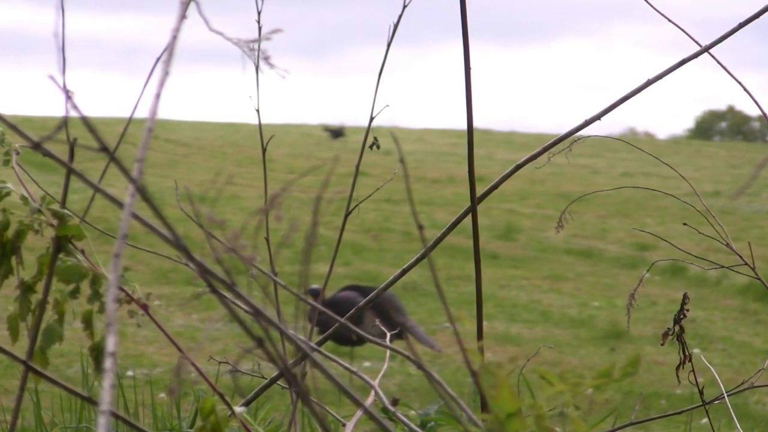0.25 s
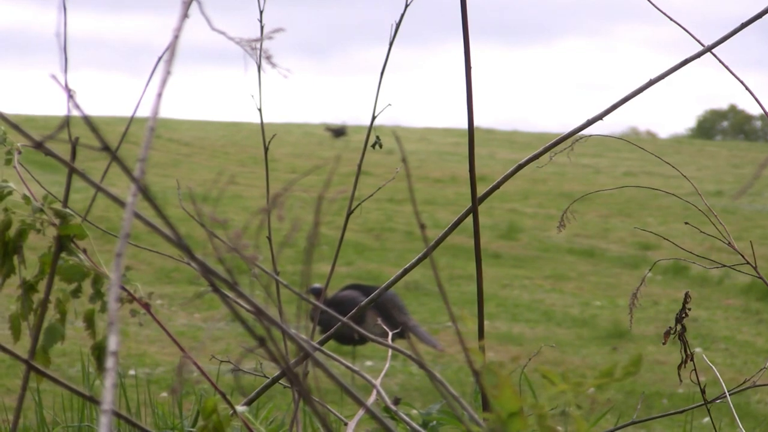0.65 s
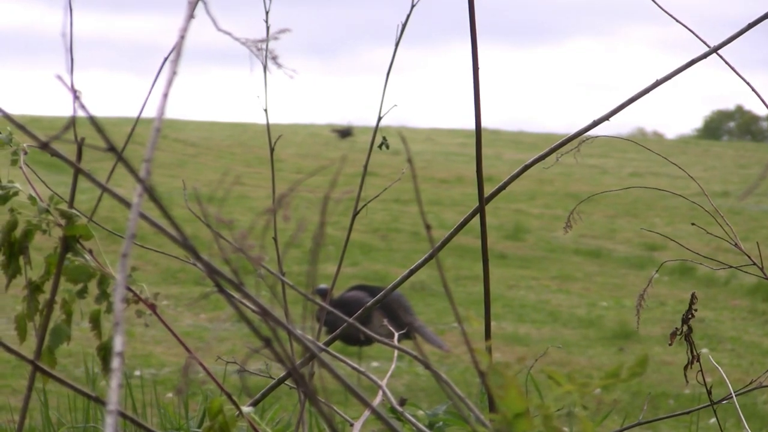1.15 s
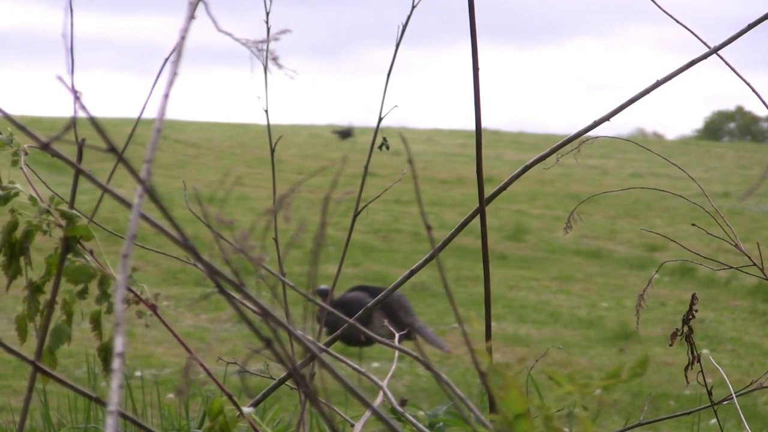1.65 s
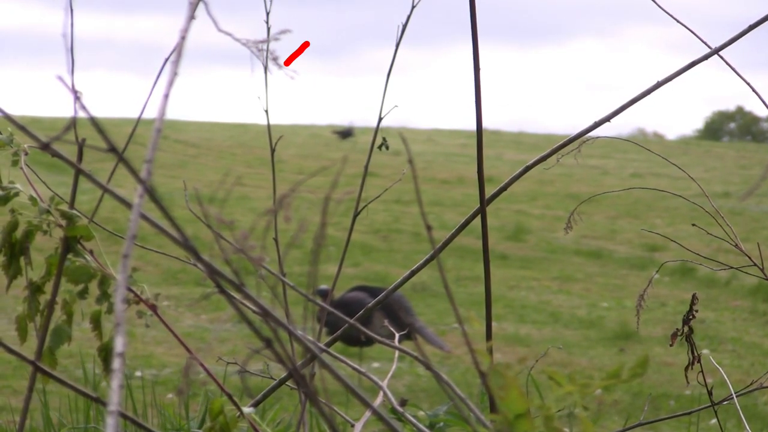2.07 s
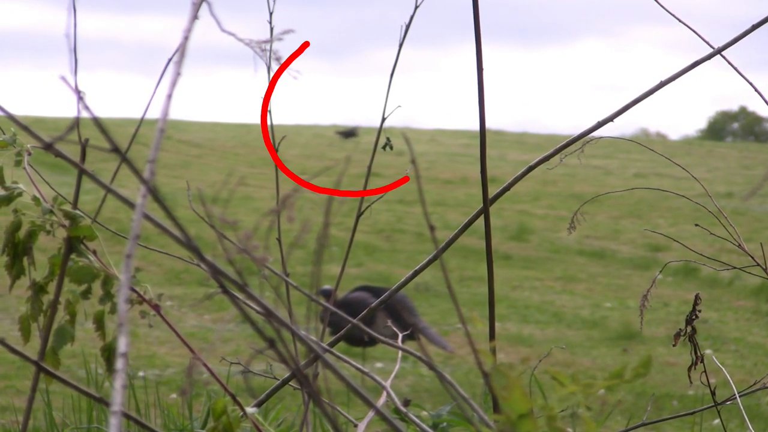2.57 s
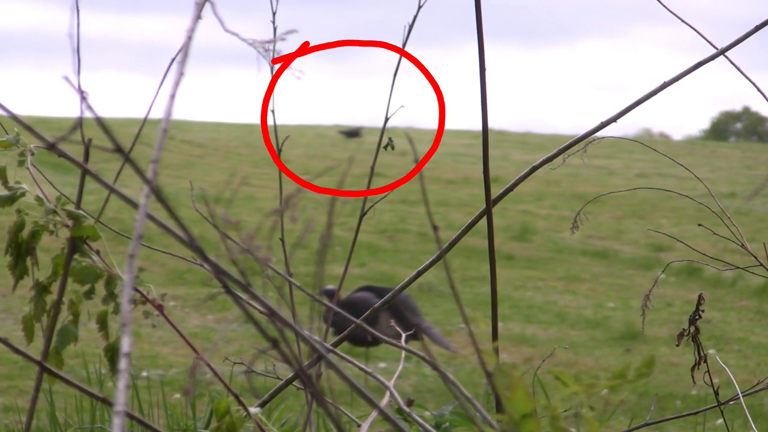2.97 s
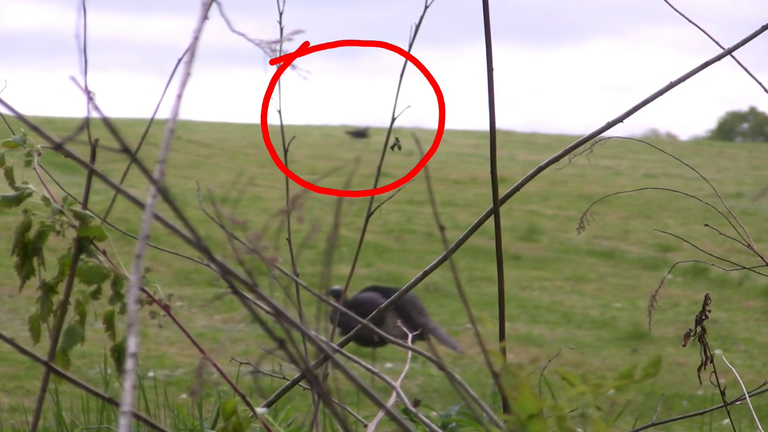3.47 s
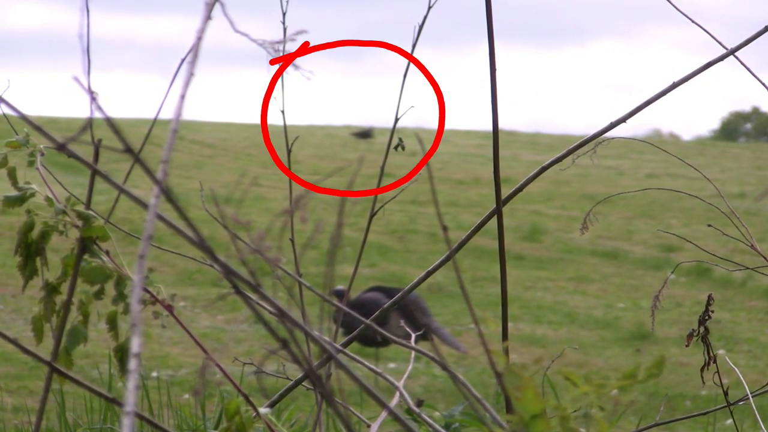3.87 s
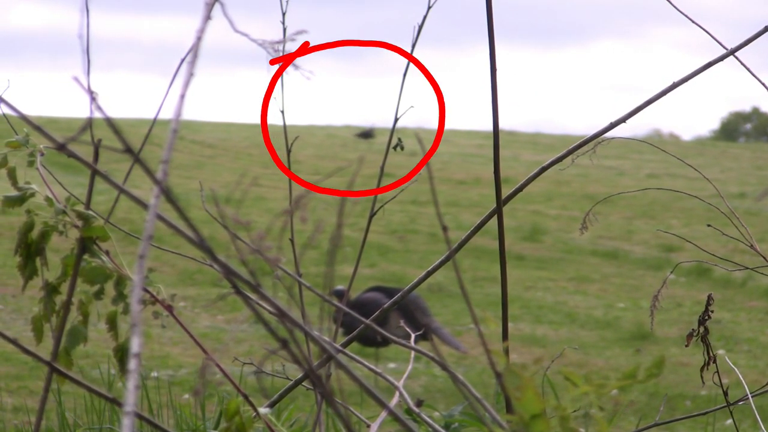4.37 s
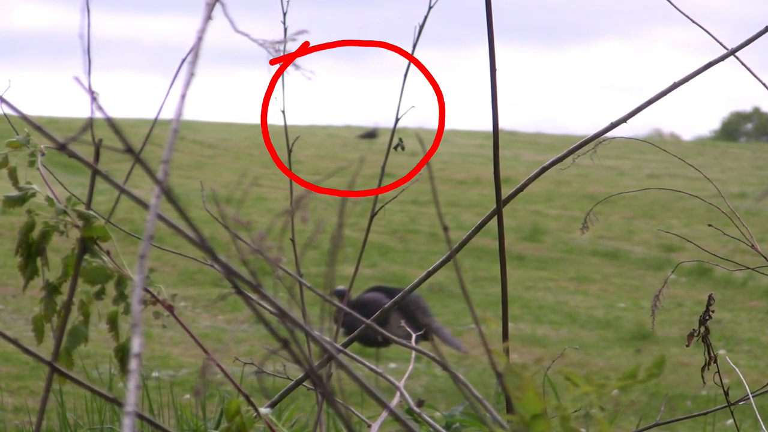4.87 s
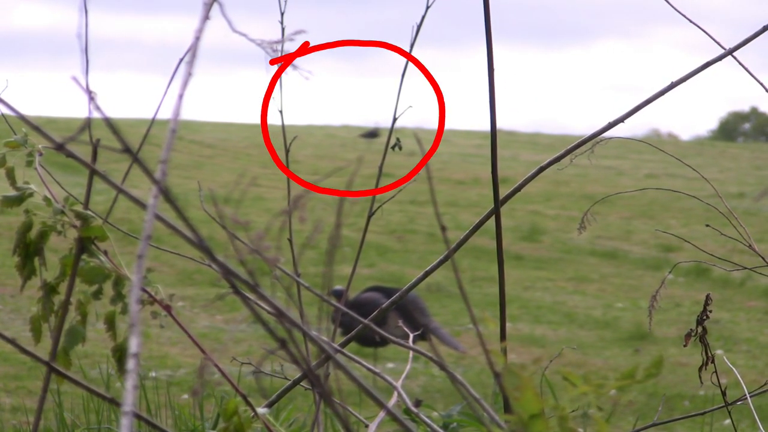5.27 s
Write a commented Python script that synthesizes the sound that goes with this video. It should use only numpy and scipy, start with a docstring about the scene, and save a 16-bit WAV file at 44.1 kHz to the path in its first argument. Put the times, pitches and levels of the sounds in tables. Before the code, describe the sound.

Soft outdoor air with gentle hiss and a very low camera hum runs throughout, slightly wide, with everything else centred. From 0 to 2.5 s distant birds call faintly: soft, short arched hoots at 0, 1.0, 1.5 and most clearly 2.0 s, thin chirps, and a small seesaw call repeating four times from 1.9 to 2.4 s. Dry twig ticks and light leaf rustles come close by between 1.4 and 3.2 s. At about 2.55 s a wild turkey gobbles once: several bright, rough yelps over a fast two-note rattle that slows, sinks and dies by 3.6 s, prolonged by tree echoes. From 3.2 s a warbler enters quietly, with dips near 3.4 and 3.6 s, a steep swoop around 4 s, then louder zigzag, arching and falling whistles until 5.5 s. A second singer gives lower short slurs deeper in the wood.

```python
"""Quiet country air, a camera's hum and faint bird calls come first, at the edge of a wood by a pasture.
A wild turkey gobbles once, uneven harmonics through a throat and beak; echoes off the trees prolong it.
As it dies away a warbler sings sliding sine whistles over a second singer deeper in the wood.
Twigs tick and leaves rustle near the microphone, as short bursts and swells of filtered noise."""
import sys
import numpy as np
from scipy import signal
from scipy.fft import rfft, irfft, next_fast_len
from scipy.io import wavfile
from scipy.ndimage import uniform_filter1d

SR = 44100
rng = np.random.default_rng(int(sys.argv[2]) if len(sys.argv) > 2 else 0)


def persist_wave(psi):
    """Save psi, clipped to +-1, as 16-bit WAV."""
    counts = np.round(np.clip(psi, -1, 1) * 32767).astype(np.int16)
    wavfile.write(sys.argv[1], SR, np.atleast_2d(counts).T)


N = 243431
TIME = np.arange(N) / SR
FREQ = np.maximum(np.fft.rfftfreq(N, 1 / SR), 1)


def undb(db):
    """Decibels to gain."""
    return 10 ** (np.asarray(db) / 20)


def unit(x):
    """Scale to rms 1."""
    return x / np.sqrt(np.mean(x ** 2) + 1e-20)


def add(out, start, x):
    """Mix x in at a time in seconds, dropping what falls outside."""
    at = int(start * SR) + np.arange(len(x))
    inside = (at >= 0) & (at < N)
    out[at[inside]] += x[inside]


def walk(size, rate):
    """Random wander of spread near 1: straight lines between new values, rate of them a second."""
    at = np.arange(size) * rate / SR
    count = int(at[-1]) + 2
    return 1.2 * np.interp(at, np.arange(count), rng.standard_normal(count))


def colour(points):
    """Gain at every frequency from (frequency [Hz], level [dB]) points."""
    hz, db = np.transpose(points)
    return undb(np.interp(np.log(FREQ), np.log(hz), db))


def resonate(x, modes, tilt_db=0):
    """Pass a short sound through (Hz, width Hz, dB) resonances, tilted in dB per octave above 1100 Hz."""
    size = next_fast_len(len(x) + 512)
    f = np.maximum(np.fft.rfftfreq(size, 1 / SR), 1)
    power = 0
    for hz, width, db in modes:
        detuning = (f * f - hz * hz) / (f * width * 2)
        power = power + undb(2 * db) / (1 + detuning ** 2) ** 2
    tilt = undb(tilt_db * np.log2(np.maximum(f / 1100, 1)))
    return irfft(rfft(x, size) * np.sqrt(power) * tilt, size)[:len(x)]


def syllable(length, hz0, hz1, rough, bright_db, beak_hz, beak_db=1):
    """One gobble note: a stack of harmonics whose cycles grow uneven and noisy as it roughens."""
    # resonances of the turkey's throat: (frequency [Hz], width [Hz], level [dB])
    throat = [(686, 220, -5), (1104, 510, 6.5), (1800, 120, -1.5), (2190, 320, 2.5), (3160, 460, -5),
              (4200, 640, -13)]
    jitter, flutter_db, rasp = 0.065, 5, .9  # pitch share, level and noise at full roughness
    size = int(length * SR)
    hz = np.linspace(hz0, hz1, size) * (1 + jitter * rough * walk(size, 535))
    phase = 2 * np.pi * np.cumsum(hz) / SR
    # the way through grass and leaves shifts each harmonic by its own amount
    shift = rng.uniform(0, 2 * np.pi, (7, 1))
    harmonics = np.cos(np.outer(np.arange(1, 8), phase) + shift)
    tone = unit(harmonics.sum(0))
    # breath noise pulses once a cycle
    turbulence = rng.standard_normal(size) * (1 + np.cos(phase))
    source = tone * undb(flutter_db * rough * walk(size, 337)) + rasp * rough * turbulence
    voice = resonate(source * signal.windows.tukey(size, .8), throat, bright_db)
    # the shaking neck and beak single out a different partial in each note
    beak = resonate(voice, [(beak_hz, 260, 0)])
    return unit(voice + undb(beak_db) * beak)


def yelps():
    """The gobble's bright yelps, each rising slightly in pitch."""
    # (start [s], length [s], middle pitch [Hz], level [dB], roughness [0-1], beak resonance [Hz])
    notes = [(2.542, 0.03, 580, -47.5, 0.27, 2170), (2.609, .04, 618, -45, 0.57, 1830),
             (2.682, .033, 573.6, -50.5, 0.47, 1160), (2.747, .034, 654, -51, 0.62, 3300),
             (2.843, 0.037, 609.3, -45.5, 0.54, 1960), (3.06, 0.033, 596.4, -48, 0.35, 1770)]
    rise, bright_db = 0.049, 3  # share of pitch gained; dB per octave
    out = np.zeros(N)
    for start, length, hz, db, rough, beak_hz in notes:
        glide = hz * rise / 2
        add(out, start, undb(db) * syllable(length, hz - glide, hz + glide, rough, bright_db, beak_hz))
    return out


def rattle():
    """The rattle under the yelps flips between two notes as it slows, sinks and dies away."""
    # course of the rattle: (time [s], low note [Hz], high note [Hz], level [dB])
    course = [(2.571, 573, 750, -51.5), (2.65, 571, 720, -51.5), (2.82, 553, 703.7, -54.5),
              (2.959, 500.4, 649, -55.5), (3.2, 487, 602.5, -60), (3.6, 454, 534.5, -63)]
    notes_per_s, slowing_s = 36, 1.5  # notes a second at first; time in which the gaps double
    note_s, sag, scatter = 0.044, .035, 0.019  # length; share of pitch lost in a note; pitch scatter
    rough, bright_db, beak_db = 0.57, -1.5, 6  # roughness 0-1; dB per octave; beak ring
    out = np.zeros(N)
    s, low, high, level = np.transpose(course)
    start, is_low = s[0], True
    while start < s[-1]:
        hz = np.interp(start, s, low if is_low else high)
        hz = hz * (1 + scatter * rng.standard_normal())
        # the beak rings with the low note's octave and with the high note itself
        beak_hz = 2 * hz if is_low else hz
        note = syllable(note_s, hz, hz * (1 - sag), rough, bright_db, beak_hz, beak_db)
        add(out, start, undb(np.interp(start, s, level)) * note)
        start += (1 + (start - s[0]) / slowing_s) / notes_per_s
        is_low = not is_low
    return out


def turkey():
    """The gobble: a few bright yelps over the two-note rattle."""
    return yelps() + rattle()


def whistle(points, waver=0.0033, shimmer_db=2.0):
    """A pure tone that slides through (s, Hz, dB) points with rounded corners in pitch."""
    s, hz, db = np.transpose(points)
    t = np.arange(s[0], s[-1] + 0.0021, 1 / SR)
    pitch = uniform_filter1d(np.interp(t, s, hz), size=260)
    pitch = pitch * (1 + waver * walk(len(t), 405.2))
    edges = np.clip(np.minimum(t - t[0], t[-1] - t) / 0.0022, 0, 1)
    level = undb(np.interp(t, s, db) + shimmer_db * walk(len(t), 203.6))
    return edges * level * np.sin(2 * np.pi * np.cumsum(pitch) / SR)


def figures(shape, notes, waver):
    """One figure sung several times, each at its own length, pitch and strength."""
    out = np.zeros(N)
    for start, length, top_hz, db in notes:
        add(out, start, undb(db) * whistle(np.array(shape) * [length, top_hz, 1], waver))
    return out


def slurs(notes, waver):
    """Whistles that bend along one smooth arc, swelling once and fading."""
    end_drop_db = 10.5  # both ends lie this far under the loudest moment
    out, u = np.zeros(N), np.linspace(0, 1, 21)
    for start, length, hz0, hz_mid, hz1, db, loudest in notes:
        arc = np.polyfit([0, .5, 1], [hz0, hz_mid, hz1], 2)
        hz = np.polyval(arc, u)
        fade_db = end_drop_db * np.interp(u, [0, loudest, 1], [1, 0, 1])
        add(out, start, whistle(np.column_stack([u * length, hz, db - fade_db]), waver))
    return out


def warble(waver=0.0063):
    """The warbler's sine song: two dips, a swoop, then zigzag, arch and falling slur in turn."""
    # levels here stand before the lift that scene() gives the song
    # shapes of three figures: (share of length, share of top pitch, level [dB])
    dip = [(0, 1, -7), (.18, .85, -1), (.44, .71, -13), (.7, 0.97, 2), (.83, 1, -14), (1, 1, -11)]
    zigzag = [(0, .63, -11.5), (.17, .64, -4), (.35, .78, 0), (.5, 1, -1.5), (.6, .74, -0.5),
              (.71, .71, -8), (.87, .91, 2.5), (1, 0.97, -6)]
    arch = [(0, .6, -11), (.19, .65, -6), (.35, .75, -0.5), (.52, .92, -16), (.67, 0.99, -12.5),
            (.76, .9, -8.5), (.85, .77, -2.5), (.92, .745, 1.5), (1, 0.91, -17)]
    # where each figure is sung: (start [s], length [s], top pitch [Hz], level [dB])
    dips = [(3.396, .157, 4280, -50), (3.636, .164, 4300, -47)]
    zigzags = [(4.307, 0.12, 5210, -47), (4.856, 0.11, 5270, -39), (5.39, .122, 5030, -42.5)]
    arches = [(4.486, .134, 6044, -36.5), (5.036, .125, 6100, -34.5)]
    # one long swoop: (time [s], pitch [Hz], level [dB])
    swoop = [(3.88, 5790, -62), (3.925, 6710, -75), (3.965, 5417, -60.5), (3.982, 4300, -52),
             (3.987, 4000, -48.5), (4.012, 3483, -45.5), (4.05, 2880, -49), (4.141, 2750, -59),
             (4.19, 3045, -50), (4.212, 3576, -44), (4.245, 3590, -52), (4.26, 3430, -66)]
    # plain slurs: (start [s], length [s], start pitch [Hz], middle pitch [Hz], end pitch [Hz],
    # level [dB], loudest at [share of length])
    plain_slurs = [(3.22, 0.071, 3900, 4300, 4500, -62, 0.31),
                   (3.835, 0.038, 5600, 4980, 4510, -52.5, 0.84),
                   (4.135, 0.085, 4120, 3560, 2500, -48.5, 0.67),
                   (4.716, .078, 4100, 3375, 2596, -36, 0.22), (5.212, 0.1, 4300, 3550, 2540, -37, 0.15)]
    out = figures(dip, dips, waver) + figures(zigzag, zigzags, waver)
    out += figures(arch, arches, waver) + slurs(plain_slurs, waver)
    add(out, swoop[0][0], whistle(swoop, waver))
    return out


def deep_singer():
    """The singer deep in the wood: sine whistles bent into short slurs."""
    # (start [s], length [s], start pitch [Hz], middle pitch [Hz], end pitch [Hz],
    # level before the lift in scene() [dB], loudest at [share of length])
    notes = [(3.572, 0.03, 3070, 2790, 2690, -54, 0.28), (3.65, .065, 3290, 2850, 2710, -51, 0.96),
             (4.004, 0.072, 3340, 2830, 2470, -44, 0.25), (4.04, .12, 3050, 2794, 2800, -57, 0.089),
             (4.10, 0.098, 2380, 2466, 2900, -48.5, 1), (4.513, 0.048, 3230, 2763, 3100, -44, 0.4),
             (4.55, 0.18, 3230, 3032, 1957, -42.5, .2), (4.962, .11, 1987, 2385, 3074, -45.5, 1),
             (5.06, 0.1, 2994, 3150, 3004, -41, 0.081), (5.47, 0.041, 3650, 2890, 2680, -42.5, .1)]
    return slurs(notes, waver=.01)


def hoots():
    """A far bird's soft arched call, a sliding sine, repeated."""
    # the calls: (start [s], level [dB])
    calls = [(-.015, -59), (0.998, -59.5), (1.474, -54.5), (1.979, -49.5), (2.461, -61), (5.281, -64)]
    # course of one call: (time after its start [s], pitch [Hz], level [dB])
    course = [(0, 1440, -12), (.016, 1446, 2.5), (.034, 1545, 1), (.052, 1474, 1.5), (.072, 1415, 1.5),
              (.094, 1290, -5)]
    out = np.zeros(N)
    for start, db in calls:
        add(out, start, undb(db) * whistle(course, waver=0.002, shimmer_db=1.2))
    return out


def chirps(rasp_depth=0.0684):
    """Lone chirps and a seesaw call, gliding sines whose pitch trembles when they rasp."""
    # lone thin chirps: (start [s], length [s], start pitch [Hz], end pitch [Hz], level [dB], rasp [0-1])
    lone = [(0.281, 0.066, 4000, 3610, -71, 0.7), (1.101, 0.041, 2590, 2260, -69.5, 0.37),
            (1.144, 0.087, 2060, 1865, -67.5, 0.3), (1.425, 0.031, 3400, 3050, -64, 0.7),
            (1.444, 0.168, 2360, 2320, -63.5, 0.36), (1.474, 0.13, 3000, 2870, -67, 0.55),
            (1.613, 0.056, 2200, 1900, -69, .5), (1.7, 0.048, 3800, 3190, -66.5, .73),
            (3.028, 0.13, 3020, 3030, -61, 0.3)]
    # a small bird's seesaw call: (start [s], level [dB])
    calls = [(1.871, -55), (2.005, -57), (2.135, -58.5), (2.263, -57.5)]
    # its clear high note and short raspy low one: (time after the start [s], length [s],
    # start pitch [Hz], end pitch [Hz], level [dB], rasp [0-1])
    pair = [(0, 0.064, 3660, 3585, 0.5, 0.13), (0.078, 0.0214, 2656, 2710, -4.5, 0.34)]
    notes = list(lone)
    for start, db in calls:
        for lag, length, hz0, hz1, note_db, rasp in pair:
            notes.append((start + lag, length, hz0, hz1, db + note_db, rasp))
    out = np.zeros(N)
    for start, length, hz0, hz1, db, rasp in notes:
        size = int(length * SR)
        hz = np.linspace(hz0, hz1, size) * (1 + rasp_depth * rasp * walk(size, 891))
        tone = np.sin(2 * np.pi * np.cumsum(hz) / SR)
        add(out, start, undb(db) * unit(signal.windows.tukey(size, .5) * tone))
    return out


def twigs(decay_s=0.00068, width_hz=1700, snap_db=-13):
    """Dry ticks near the microphone: a few milliseconds of woody noise with a thin top."""
    # (time [s], level [dB], centre [Hz])
    ticks = [(1.5005, -67, 5960), (1.52, -62, 7700), (1.8185, -54, 4520), (1.9886, -63, 4500),
             (2.3989, -63, 4530), (2.5674, -52.5, 6000), (2.692, -61.5, 5500), (2.8716, -63, 5500),
             (3.205, -57.5, 2970)]
    out, t = np.zeros(N), np.arange(512) / SR
    for start, db, hz in ticks:
        burst = rng.standard_normal(len(t)) * np.exp(-t / decay_s) * np.minimum(t / 0.0029, 1)
        add(out, start, undb(db) * unit(resonate(burst, [(hz, width_hz, 0), (11000, 2500, snap_db)])))
    return out


def leaves(grain_db=3):
    """Leaves brush each other near the microphone: fine noise grains that swell and fade."""
    # (start [s], length [s], level [dB])
    rustles = [(1.404, 0.24, -77), (1.736, 0.11, -69), (2.358, 0.32, -67)]
    out = np.zeros(N)
    for start, length, db in rustles:
        size = int(length * SR)
        grains = rng.standard_normal(size) * undb(grain_db * walk(size, 750)) * np.hanning(size)
        add(out, start, undb(db) * unit(resonate(grains, [(3800, 1320, 2), (7500, 3000, -9)])))
    return out


def woods(x, near_db, near_t60, far_db, far_t60, dull_hz):
    """Trunks close by scatter a quick echo; the deep wood returns a slower-building, duller one."""
    t = np.arange(2 * SR) / SR

    def scatter(t60, onset_s):
        """Echoes of uneven strength that build up and fade by 60 dB in t60 seconds."""
        echoes = rng.standard_normal(len(t)) * rng.exponential(size=len(t))
        tail = echoes * np.exp(-np.log(1000) * t / t60) * (1 - np.exp(-t / onset_s))
        return signal.fftconvolve(x, tail / np.linalg.norm(tail))[:N]

    near = scatter(near_t60, 0.0011)
    dull = signal.butter(2, dull_hz, fs=SR, output="sos")
    deep = signal.sosfilt(dull, scatter(far_t60, 0.079))
    return x + undb(near_db) * near + undb(far_db) * deep


def hum():
    """The camera's mechanism hums: low sine tones whose level and phase waver."""
    # (frequency [Hz], level [dB], waver [dB])
    tones = [(29.2, -62, .5), (59.3, -67.5, 3.5), (180, -74.5, 0.5), (243.6, -74.5, 2)]
    out = np.zeros(N)
    for hz, db, waver_db in tones:
        tone = np.sin(2 * np.pi * hz * TIME + 0.21 * walk(N, 3.85))
        out += undb(db) * unit(undb(waver_db * walk(N, 8.8)) * tone)
    return out


def air():
    """Country air and hiss: coloured stereo noise, with two bands of its middle swelling a little."""
    # spectrum of the air: (frequency [Hz], relative level per Hz [dB])
    spectrum = [(44, -16), (75, -1), (117, -3.5), (171, -1.5), (209, -1), (234, -5), (447, -8), (522, -7.5),
                (638, -8), (834, -6.5), (1520, -13), (2660, -18.5), (3640, -18.5), (4160, -22),
                (15500, -26)]
    # side over middle: (frequency [Hz], level [dB])
    width = [(60, -13.5), (250, -16), (1000, -21), (2500, -16), (5000, -6.5), (9000, -3), (15000, -3.5)]
    # swell of the two bands: (time [s], level [dB])
    swell = [(0, -2.5), (.6, 0), (1.1, -0.2), (2.0, 0.5), (2.5, 2.5), (4.0, -0.5), (4.7, -1), (5.5, -2)]
    mid, side = (irfft(rfft(rng.standard_normal(N)) * colour(spectrum), N) for _ in range(2))
    side = irfft(rfft(unit(side)) * colour(width), N)
    mid = unit(mid)
    swell_gain = undb(np.interp(TIME, *np.transpose(swell)))
    for band_hz in [(100, 133), (500, 3300)]:
        sos = signal.butter(2, band_hz, "band", fs=SR, output="sos")
        mid = mid + signal.sosfiltfilt(sos, mid) * (swell_gain - 1)
    # -56 dB is the middle's level before it swells
    return undb(-56) * np.array([mid + side, mid - side])


def scene():
    """All the sources stand straight ahead of the microphone; only the air has width."""
    gobble = woods(turkey(), near_db=-3.5, near_t60=0.91, far_db=0.5, far_t60=1.97, dull_hz=1220)
    warbler = woods(undb(2.5) * warble(), near_db=-3, near_t60=0.48, far_db=-9.0, far_t60=2.1, dull_hz=5570)
    # more of the deep singer than of the warbler arrives as echo
    singer = woods(undb(0.5) * deep_singer(), near_db=-1.0, near_t60=0.31, far_db=-4.0, far_t60=0.67,
                   dull_hz=4000)
    caller = woods(hoots(), near_db=-25, near_t60=0.23, far_db=-12, far_t60=1.0, dull_hz=3000)
    small_birds = woods(chirps(), near_db=-8, near_t60=0.28, far_db=-5.5, far_t60=0.96, dull_hz=4013)
    ticks = woods(twigs(), near_db=-6.5, near_t60=0.11, far_db=-4.5, far_t60=0.85, dull_hz=4940)
    return gobble + warbler + singer + caller + small_birds + ticks + leaves() + hum() + air()


def record(dry):
    """The camera cuts the top steeply above 15.8 kHz."""
    return signal.sosfilt(signal.ellip(10, .1, 70, 15800, fs=SR, output="sos"), dry)


dry = scene()
out = record(dry)
persist_wave(out)
```